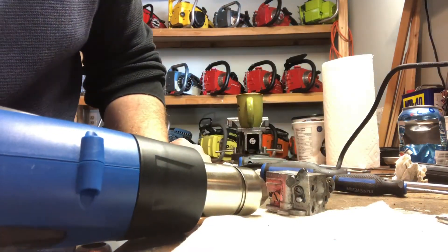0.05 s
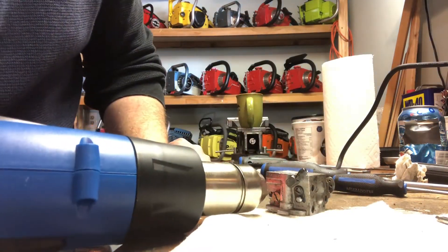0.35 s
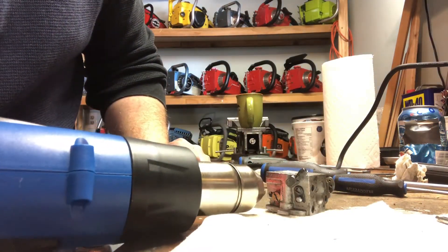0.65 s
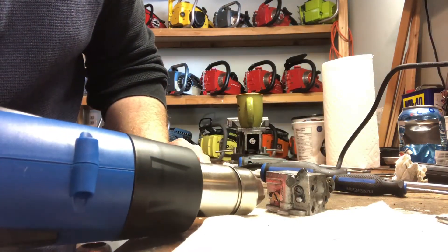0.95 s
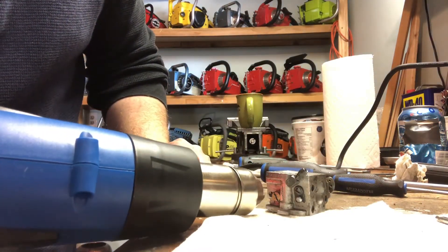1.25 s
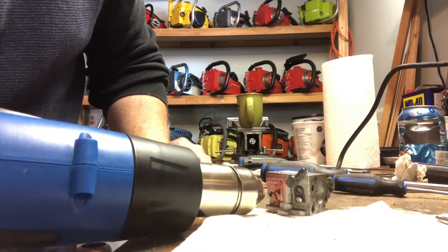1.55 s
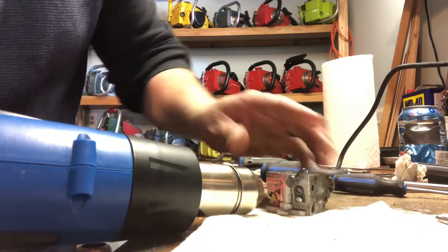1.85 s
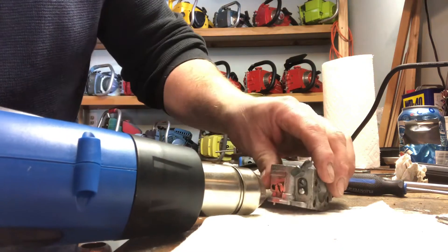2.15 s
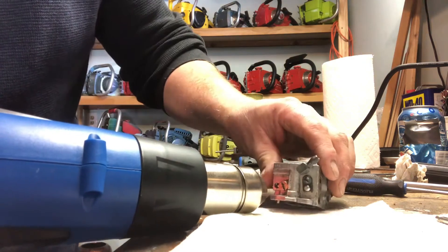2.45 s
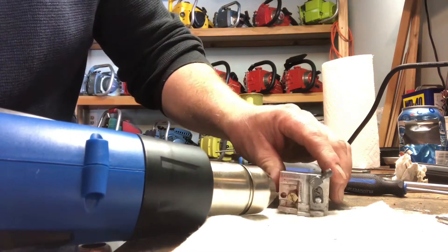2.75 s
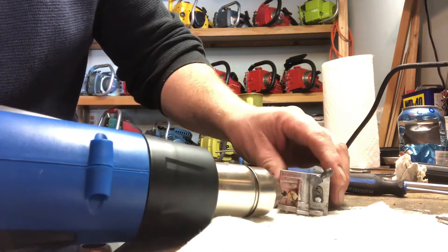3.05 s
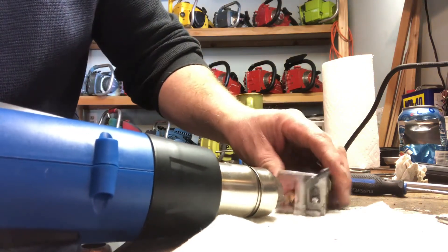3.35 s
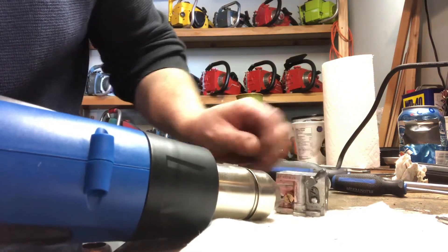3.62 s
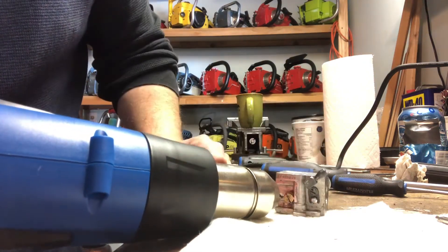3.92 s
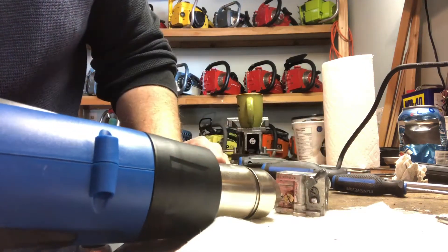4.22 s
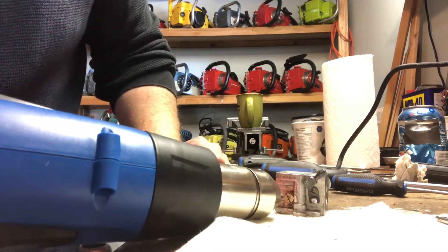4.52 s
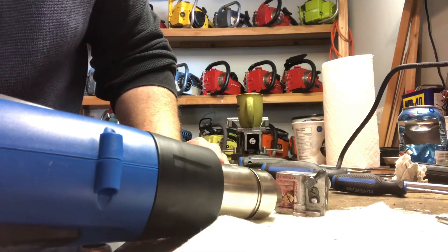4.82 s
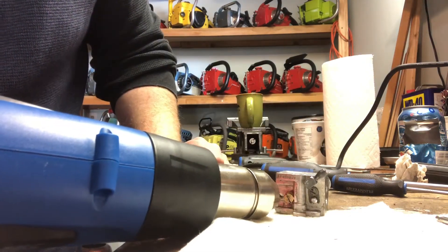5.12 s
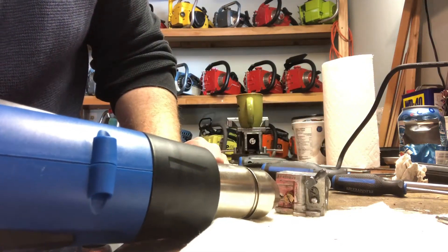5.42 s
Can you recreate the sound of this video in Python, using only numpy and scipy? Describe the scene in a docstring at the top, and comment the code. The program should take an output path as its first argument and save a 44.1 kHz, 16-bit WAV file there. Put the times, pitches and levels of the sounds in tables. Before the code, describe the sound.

An electric heat gun blows a steady rush of hot air with a motor hum and whine, and two soft double bumps on a workbench.

```python
"""At a workbench, one close microphone on an electric heat gun that blows hot air at a small metal part.
The fan drives an even rush of air through the barrel. The motor hums and whines, its brushes sizzle,
and it creeps up in speed as it warms. Midway a hand turns the part round and sets it down:
the rush turns slightly duller, and there are two soft double bumps on the padded bench."""
import sys
import numpy as np
from scipy import signal
from scipy.fft import rfft, irfft, next_fast_len
from scipy.io import wavfile

SR = 44100
rng = np.random.default_rng(int(sys.argv[2]) if len(sys.argv) > 2 else 0)


def materialize(psi):
    """Save the field psi as 16-bit PCM at rate SR to the path in sys.argv[1].

    A 1-D psi becomes a single channel; in a 2-D psi each row is a channel.
    """
    bounded = np.clip(np.atleast_2d(psi).T, -1, 1)
    quanta = np.round(bounded * 32767).astype(np.int16)
    wavfile.write(sys.argv[1], SR, quanta)


N = 250129
TIME = np.arange(N) / SR
COOL_SPEED_HZ, WARM_SPEED_HZ = 171.8, 173.8   # rotor turns per second
MAINS_HZ = 60

# turbulence of the air stream, before the barrel colours it: (frequency [Hz], density [dB per Hz])
TURBULENCE = [(30, -120), (60, -100), (130, -94.5), (250, -85.5), (450, -85), (560, -76.5), (1100, -81),
              (2300, -94), (3800, -97.5), (5000, -100.2), (7500, -106.5), (8200, -110), (11000, -112.5),
              (15500, -117)]
# resonances of barrel and housing: (centre [Hz], width [Hz], lift [dB])
BARREL_RESONANCES = [(442, 40, -4), (475, 28, 3.5), (671, 214, 11.5), (1053, 100, 6.5), (1510, 310, 8),
                     (1991, 247, 12.5), (2414, 455, 9), (3140, 470, 7.5), (3740, 930, 6), (4680, 180, 5),
                     (5700, 610, 6), (7400, 780, 7.5)]
# change in the colour of the rush as the part is turned: (frequency [Hz], change [dB])
LATE_TINT = [(900, -0.5), (1120, 1.5), (1450, -2), (1750, 0), (2100, -1), (3600, -1), (4600, -2.5),
             (5700, -0.5), (8800, -2.5), (12500, -3)]
# fan and motor tones: (order [per turn], cool level [dB], warm level [dB])
MOTOR_TONES = [(3, -61, -59), (7, -57, -55), (8, -63, -58), (9, -66, -61), (10, -57, -51.5),
               (11, -61, -59.5), (14, -73, -69), (15, -70, -67), (17, -74, -72), (20, -78, -69),
               (21, -76, -72), (22, -72, -70), (24, -80, -77), (25, -87, -71), (30, -84, -73),
               (31, -78, -76), (33, -78, -75), (34, -78, -80), (35, -78, -75), (38, -80, -84),
               (39, -76, -77), (40, -77, -81), (44, -88, -82), (45, -76, -73), (46, -84, -84),
               (47, -83, -82), (52, -78, -87), (56, -82, -78), (64, -78, -87)]
# brief swells of the hum, and dips while the hand is at the part: (middle [s], half length [s], change [dB])
HUM_CHANGES = [(.08, .12, 5.5), (2.55, 0.39, -8.5), (3.62, .17, -5.5), (5.26, .12, 6.5), (5.64, .12, 4.5)]
# whine of the five-bar commutator: (order [per turn], cool level [dB], warm level [dB])
COMMUTATOR_TONES = [(50.3, -72, -72), (55.2, -73.5, -73), (59.8, -76.5, -74)]
# part and hand bump on the padded bench: (time [s], peak level [dB], pitch [Hz], time to fall 60 dB [s])
BENCH_BUMPS = [(2.66, -58, 74, 0.16), (2.803, -57.5, 90, 0.13), (3.62, -71, 85, .2),
               (3.705, -63, 101, 0.17)]
# sizzle of the brushes when half warm: (frequency [Hz], level per tone [dB])
BRUSH_SPECTRUM = [(10500, -91), (11500, -89.5), (12300, -90.5), (12800, -93), (14000, -93), (14800, -86),
                  (15200, -96)]


def air_rush(turned, early_db=-0.55, late_db=0.57, flutter_db=0.36):
    """Turbulence coloured by the barrel; the rush turns slightly duller midway, as the part is turned."""
    size = next_fast_len(N)
    hz = np.fft.rfftfreq(size, 1 / SR)
    lift_db = sum(db / (1 + (2 * (hz - centre) / width) ** 2) for centre, width, db in BARREL_RESONANCES)
    white = rfft(rng.standard_normal(size)) * np.sqrt(SR / 2)
    rush = white * from_db(at_hz(TURBULENCE, hz) + lift_db)
    half_tint = from_db(at_hz(LATE_TINT, hz) / 2)
    early = irfft(rush / half_tint, size)[:N]
    late = irfft(rush * half_tint, size)[:N]
    gain_db = between(early_db, late_db, turned) + flutter_db * drift(6.3)
    return between(early, late, turned) * from_db(gain_db)


def fan_blades(angle, warmth, blades=6, cool_db=-53, warm_db=-47.5, flutter_db=1.3):
    """The blade tone grows with warmth and flutters in the turbulent intake."""
    return tone(blades * angle, between(cool_db, warm_db, warmth) + flutter_db * drift(3.5))


def motor_tones(angle, warmth, trim_db=-0.27):
    """Fan and motor sound at multiples of the speed; short waves waver most in the moving air."""
    out = np.zeros(N)
    for order, cool_db, warm_db in MOTOR_TONES:
        waver_db = (0.73 + 0.0165 * order) * drift(2.3)
        out += tone(order * angle, between(cool_db, warm_db, warmth) + trim_db + waver_db)
    return out


def rotor_hum(angle, rotor_db=-61.5, mains_db=-80):
    """The unbalanced rotor shakes once a turn; its hum swells and dips over a faint mains hum."""
    swell_db = sum(db * np.exp(-((TIME - middle) / half_s) ** 2) for middle, half_s, db in HUM_CHANGES)
    return tone(angle, rotor_db + swell_db) + tone(2 * np.pi * 2 * MAINS_HZ * TIME, mains_db)


def commutator_whine(angle, warmth, bar_db=-1.3, uneven_db=-4.0, waver_db=1.4):
    """Tones near high multiples of the bar rate; uneven bars give each a companion one order lower."""
    out = np.zeros(N)
    for order, cool_db, warm_db in COMMUTATOR_TONES:
        level_db = between(cool_db, warm_db, warmth)
        out += tone(order * angle, level_db + bar_db + waver_db * drift(1.7))
        out += tone((order - 1) * angle, level_db + uneven_db + waver_db * drift(1.5))
    return out


def bench_bumps(rise_s=0.014):
    """Each cushioned contact swells into one low, short ring of the bench top."""
    out = np.zeros(N)
    for start, peak_db, hz, t60 in BENCH_BUMPS:
        age = np.maximum(TIME - start, 0)
        rise = 1 - np.exp(-(age / rise_s) ** 2)
        envelope = rise * from_db(-60 * age / t60)
        out += from_db(peak_db) * envelope / envelope.max() * np.sin(2 * np.pi * hz * age)
    return out


def brush_sizzle(angle, warmth, waver_db=2.5, warm_rise_db=4.0):
    """Faint behind the rush, the sliding brushes add high multiples of the speed, uneven in level."""
    mid_speed_hz = (COOL_SPEED_HZ + WARM_SPEED_HZ) / 2
    out = np.zeros(N)
    for order in range(62, 91):
        level_db = at_hz(BRUSH_SPECTRUM, order * mid_speed_hz) + warm_rise_db * (warmth - .5)
        out += tone(order * angle, level_db + waver_db * drift(0.38))
    return out


def rotor_angle(warmth, wander_hz=0.0698, mains_rad=0.016, rectified_rad=0.0078):
    """The shaft speeds up with warmth; rectified mains nudges it, splitting high tones into clusters."""
    speed_hz = between(COOL_SPEED_HZ, WARM_SPEED_HZ, warmth) + wander_hz * drift(1.44)
    mains = 2 * np.pi * MAINS_HZ * TIME
    nudge = mains_rad * np.sin(mains) + rectified_rad * np.cos(2 * mains)
    return 2 * np.pi * np.cumsum(speed_hz) / SR + nudge


def s_curve(middle_s=2.8, time_constant_s=.5):
    """A smooth rise from 0 to 1, steepest midway."""
    return 1 / (1 + np.exp((middle_s - TIME) / time_constant_s))


def between(first, last, progress):
    """A quantity on its way from its first to its last value."""
    return first + progress * (last - first)


def tone(angle, level_db):
    """A sine of the given rms level, starting anywhere in its cycle."""
    return np.sqrt(2) * from_db(level_db) * np.sin(angle + rng.uniform(0, 2 * np.pi))


def drift(rate_hz):
    """A slow random wander of spread 1 that changes about rate_hz times a second."""
    hop, settle = 100, 1000   # samples per step, steps for the filter to settle
    pole = np.exp(-2 * np.pi * rate_hz * hop / SR)
    noise = rng.standard_normal(N // hop + settle + 2)
    slow = signal.lfilter([1], [1, -2 * pole, pole * pole], noise)[settle:]
    return np.interp(np.arange(N) / hop, np.arange(len(slow)), slow / slow.std())


def at_hz(points, hz):
    """A spectrum read on a log-frequency axis."""
    corners, values = np.transpose(points)
    return np.interp(np.log(hz + 1e-9), np.log(corners), values)


def from_db(db):
    """Decibels to gain."""
    return 10 ** (np.asarray(db) / 20)


def scene():
    """The running gun and the handling of the part, at one close microphone."""
    warmth = turned = s_curve()   # the motor's warming and the turning of the part share one curve
    angle = rotor_angle(warmth)
    air = air_rush(turned)
    machine = rotor_hum(angle) + fan_blades(angle, warmth) + motor_tones(angle, warmth)
    contacts = commutator_whine(angle, warmth) + brush_sizzle(angle, warmth)
    return (air + machine + contacts + bench_bumps())[None]


def record(dry):
    """The microphone's signal is cut steeply above 15.7 kHz."""
    return signal.sosfilt(signal.ellip(12, .1, 80, 15700, fs=SR, output="sos"), dry)


dry = scene()
out = record(dry)
materialize(out)
```